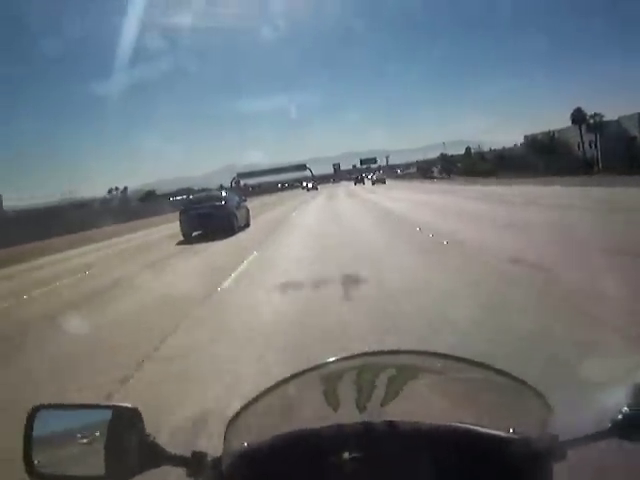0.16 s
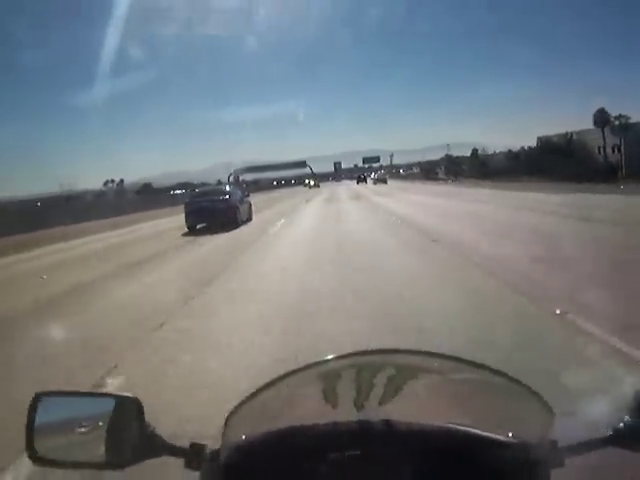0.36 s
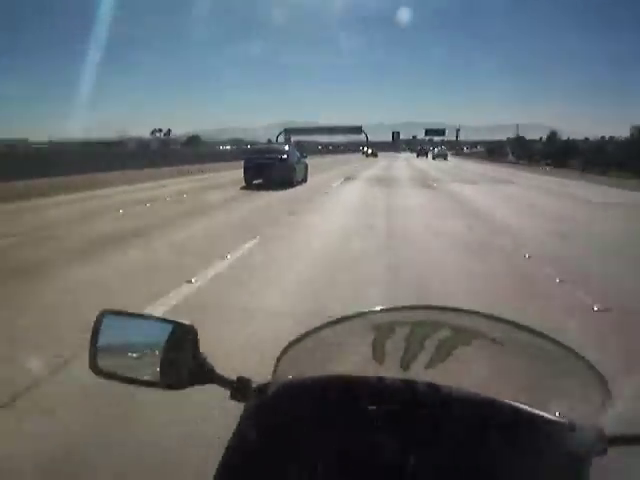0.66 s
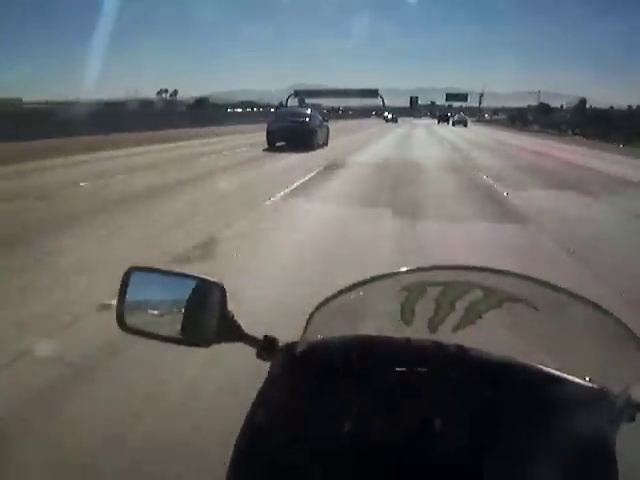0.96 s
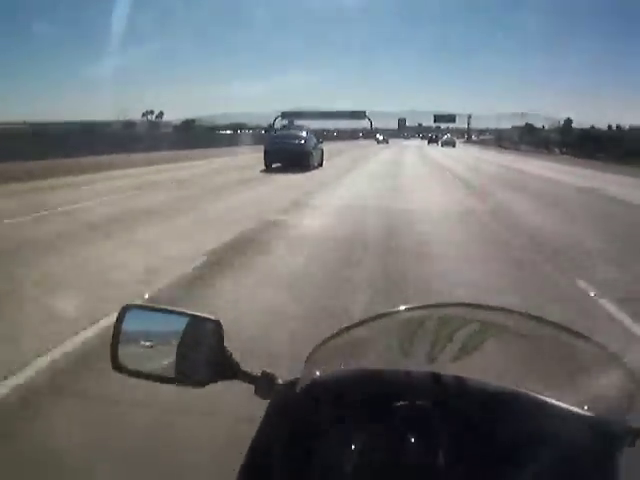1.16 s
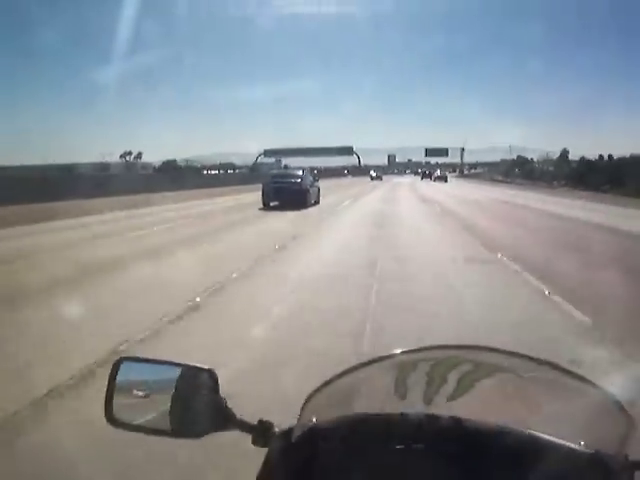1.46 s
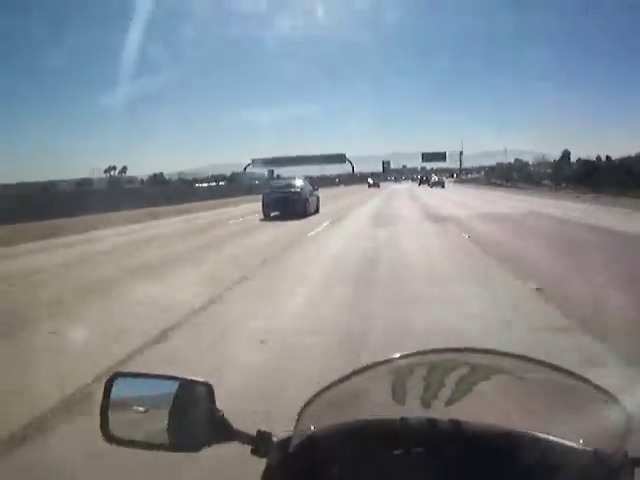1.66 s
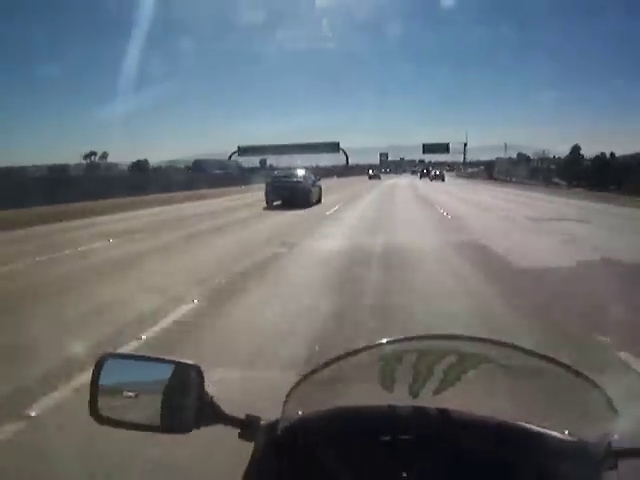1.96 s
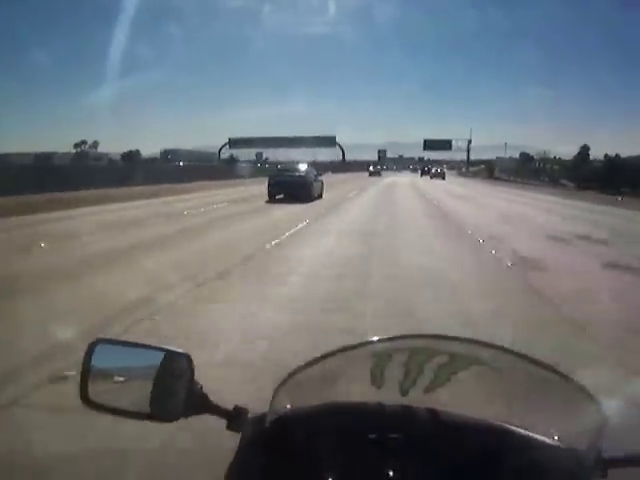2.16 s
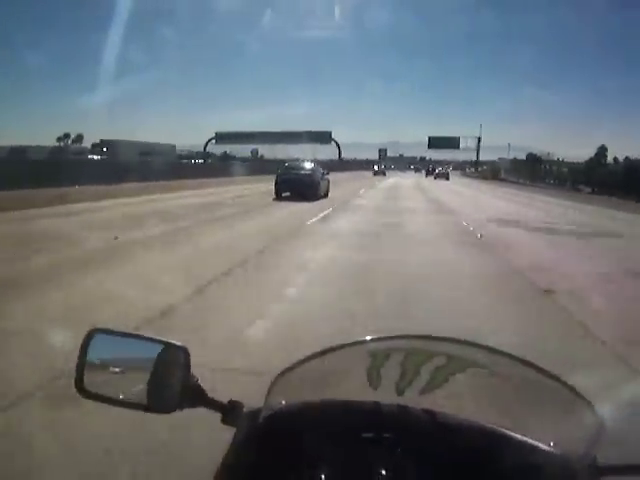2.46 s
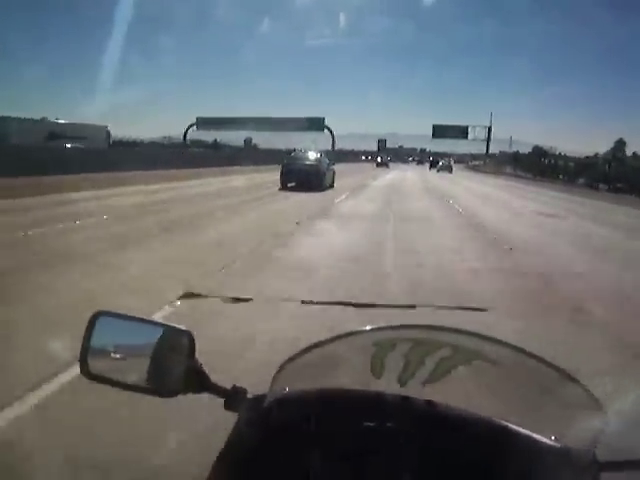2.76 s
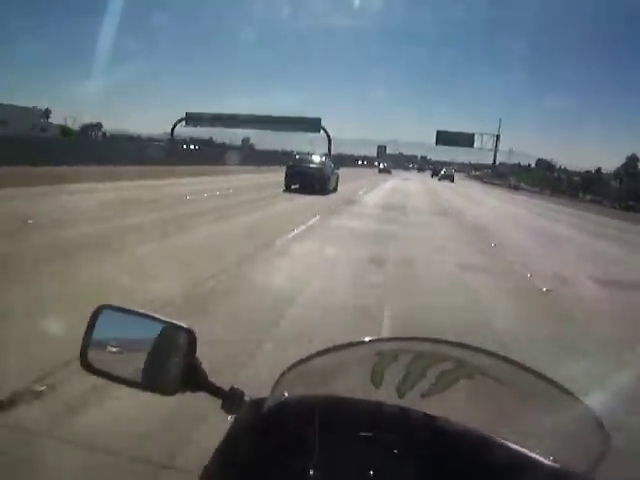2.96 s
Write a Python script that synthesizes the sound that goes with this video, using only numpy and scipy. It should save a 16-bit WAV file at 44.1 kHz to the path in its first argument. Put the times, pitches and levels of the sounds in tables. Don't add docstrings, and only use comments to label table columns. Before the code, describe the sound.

A motorcycle's steady low engine hum beneath heavy, rumbling, flapping wind and a hissing roar.

```python
import sys
import numpy as np
from scipy import signal
from scipy.fft import rfft, irfft, next_fast_len
from scipy.io import wavfile
from scipy.ndimage import uniform_filter1d, map_coordinates

SR = 44100
rng = np.random.default_rng(int(sys.argv[2]) if len(sys.argv) > 2 else 0)


def to_wav(sig):
    pcm = np.clip(np.atleast_2d(sig), -1, 1) * 32767
    pcm = np.round(pcm).astype(np.int16)
    wavfile.write(sys.argv[1], SR, pcm.T)


def nominal_scale(level):
    x = np.asarray(level, float) / 20
    return 10 ** x


N = 136710


def unit(x):
    return x / np.sqrt(np.mean(x ** 2) + 1e-20)


def along(points, hz):
    point_hz, value = np.transpose(points)
    return np.interp(np.log(hz + 1), np.log(point_hz + 1), value)


def curves(rows):
    time_s, *columns = np.transpose(rows)
    return [np.interp(np.arange(N) / SR, time_s, column) for column in columns]


def wobble(rate):
    return map_coordinates(rng.standard_normal(N // 64), [np.arange(N) * rate / SR])


def swell(center_s, length_s):
    offset = (np.arange(N) / SR - center_s) / max(length_s, .004)
    return np.cos(np.pi * np.clip(offset, -1, 1) / 2) ** 2


def swells(rows):
    return sum(lift_db * swell(center_s, length_s) for center_s, length_s, lift_db in rows)


def filtered(x, response):
    size = next_fast_len(N + SR // 2)
    spectrum = rfft(x, size) * response(np.fft.rfftfreq(size, 1 / SR))
    return irfft(spectrum, size)[..., :N]


def rush(response, patchy_db):
    bins = signal.stft(rng.standard_normal(N), nperseg=512)[2]
    patches = uniform_filter1d(rng.standard_normal(bins.shape), size=8, axis=0)
    patches = unit(uniform_filter1d(patches, size=6, axis=1))
    noise = signal.istft(bins * nominal_scale(patchy_db * patches), nperseg=512)[1][:N]
    return unit(filtered(noise, response))


# time_s, level_db
WIND_STRENGTH = [
    (0.0, -22),
    (1.1, -16),
    (1.2, -20),
    (1.25, -18),
    (2.02, -19.5),
    (2.04, -18),
    (2.62, -19.5),
    (2.91, -18),
    (3.1, -15.5),
]


def wind():
    strength_db, = curves(WIND_STRENGTH)
    bursts = wobble(40)
    eddy_gust_db, roar_gust_db = gusts()
    push = buffeting() + eddies(eddy_gust_db, bursts)
    return slapped(nominal_scale(strength_db) * push) + roar(strength_db, roar_gust_db, bursts)


# center_s, length_s, lift_db
BUFFET_SURGES = [(.06, 0.14, 6), (0.406, .1, -2.5), (0.555, 0.18, 2), (0.858, 0.089, -3.5),
                 (1.03, 0.18, -1), (1.33, 0.061, -4), (1.706, 0.12, 1.5), (2.06, 0.15, 2.5),
                 (2.377, 0.19, 0.5), (2.62, 0.16, -2), (2.899, 0.092, 3.5)]
# freq_hz, density_db (per Hz)
BUFFET_COLOUR = [(3, -32), (10, -6.5), (25, 1.5), (60, -1), (110, -6), (200, -20.5), (500, -50.5)]


def buffeting():
    level_db = -0.5 + swells(BUFFET_SURGES) + 0.3 * wobble(9.8)
    return nominal_scale(level_db) * rush(lambda hz: nominal_scale(along(BUFFET_COLOUR, hz)) * (hz < 500), patchy_db=0.35)


# center_s, length_s, lift_db
EDDY_SWELLS = [(0.279, 0.22, 3), (0.389, .14, 1.5), (0.606, 0.074, -2.5), (.9, .4, 0), (1.32, 0.061, -0.5),
               (1.479, .08, 0), (1.69, 0.067, 3.5), (1.86, .16, 1.5), (1.971, .1, -1.5), (2.199, .08, 1.5),
               (2.446, 0.091, 4), (2.696, 0.2, 1), (2.98, 0.09, 5)]
# freq_hz, density_db (per Hz)
EDDY_COLOUR = [(60, -21.5), (120, 2), (200, -0.5), (300, -5.5), (430, -12.5), (700, -25.5), (1100, -48)]


def eddies(gust_db, bursts):
    level_db = -4.5 + gust_db + swells(EDDY_SWELLS) + 1.3 * bursts
    return nominal_scale(level_db) * rush(lambda hz: nominal_scale(along(EDDY_COLOUR, hz)) * (hz < 1100), patchy_db=-0.75)


# center_s, eddy_lift_db, roar_lift_db
SHORT_GUSTS = [(0.234, -2, 1.5), (0.353, 6.5, 3), (0.457, 3, 0.7), (0.569, 5.5, -0.5), (0.821, 11, 1.5),
               (0.921, 4, 1.5), (1.019, 4.8, 2.5), (1.16, 5, 1.5), (1.24, 2, 1.5), (1.305, 3.5, 2),
               (1.374, 5.5, -0.3), (1.769, 0.5, 2.8), (1.803, 2, 1.2), (1.962, 0.5, 0.5), (2.073, 3, 5.5),
               (2.116, 5, 4), (2.199, 3.5, 4), (2.256, 3.5, 3), (2.299, 1, 1), (2.337, 9, 3.5),
               (2.387, 4, 1.5), (2.46, -0.3, 1), (2.5, 1.5, 3.5), (2.546, 5, -0.5), (2.614, 7, 2.5),
               (2.672, 1.5, 1), (2.711, 6.5, 6.5), (2.753, 7.5, 1.8), (2.864, 3.5, 4), (2.913, 2.6, 5),
               (3.017, 0.5, 4)]


def gusts():
    gust_s, between_gusts_db = 0.034, -1.5
    eddy_db, roar_db = sum(np.outer(lifts_db, swell(center_s, gust_s))
                           for center_s, *lifts_db in SHORT_GUSTS)
    return between_gusts_db + eddy_db, roar_db


# center_s, peak_db, width_ms
PORT_SLAPS = [(.013, -9, 2.3), (.062, -7.5, 2.4), (.357, -12.5, 2.2), (0.46, -11, 2.2), (.533, -8.5, 1.9),
              (.651, -5, 2.4), (0.715, -8, 2.1), (.818, -10, 3), (.841, -11, 4.3), (.964, -7, 2.9),
              (1.027, -9, 4.1), (1.081, -11.5, 2.4), (1.377, -19.5, 4.1), (1.466, -10.5, 3.9),
              (1.592, -8, 2.1), (1.716, -15, 1.3), (1.799, -7.5, 1.7), (1.967, -15, 1.8),
              (2.044, -7.5, 4.1), (2.07, -16.5, 1.3), (2.11, -13, 2.1), (2.201, -12.5, 5.7),
              (2.918, -12, 7.5), (2.971, -11.5, 1.9)]


def slapped(air):
    t = np.arange(N) / SR
    hush_depth, hush_s = .85, .007
    hush = np.clip(sum(swell(center_s, hush_s) for center_s, _, _ in PORT_SLAPS), 0, 1)
    slaps = sum(nominal_scale(peak_db) / (1 + (2000 * (t - center_s) / width_ms) ** 2)
                for center_s, peak_db, width_ms in PORT_SLAPS)
    return air * (1 - hush_depth * hush) + slaps


# freq_hz, density_db (per Hz)
ROAR_COLOUR = [(300, -12), (800, -4.5), (1150, -5.5), (1600, -3.5), (2900, -10.5), (4200, -17),
               (7000, -19.5), (8200, -30)]
# center_hz, width_hz, level_db
HOUSING_CAVITIES = [
    (1356, 87, -57.5),
    (2102, 570, -48),
    (3520, 560, -55.5),
]


def roar(strength_db, gust_db, bursts):
    air = nominal_scale(-45) * rush(lambda hz: nominal_scale(along(ROAR_COLOUR, hz)) * (hz > 300), patchy_db=0.93)
    for center_hz, width_hz, level_db in HOUSING_CAVITIES:
        def resonance(hz):
            return (hz * width_hz / (center_hz ** 2 - hz ** 2 + 1j * hz * width_hz)) ** 2
        air = air + nominal_scale(level_db) * rush(resonance, patchy_db=-2.9)
    follow_db = .25 * (strength_db - strength_db.mean()) + .5 * gust_db
    flutter_db = .25 * wobble(11.0) + 0.086 * bursts + 0.17 * wobble(40)
    return nominal_scale(follow_db + flutter_db) * air


# time_s, first_order_db, upper_orders_db
ENGINE_LEVEL = [(0, -31, -33), (.3, -31.5, -33.5), (.6, -27, -32.5), (1, -32, -32), (1.3, -29.5, -32),
                (1.65, -31, -35), (2, -28, -34.5), (2.25, -27, -34), (2.5, -26.5, -35), (2.8, -28, -34.5),
                (3.1, -24.5, -34.5)]
# level_db (against the engine level), change_db_per_s
FIRING_ORDERS = [
    (-0.5, 0),
    (0.5, 0.5),
    (-33, 2.5),
    (-20.5, 0.1),
    (-28.5, -.5),
    (-30, 3),
]
ORDER_FLUTTER = (.6, .9, 3, 1, 2, 2)


def engine():
    t = np.arange(N) / SR
    first_db, upper_db = curves(ENGINE_LEVEL)
    firing_hz = 223.9 + 4.3 * t + .2 * wobble(6.15)
    phase = 2 * np.pi * np.cumsum(firing_hz) / SR
    hum = np.zeros(N)
    for order, ((level_db, change_db_per_s), flutter_db) in enumerate(zip(FIRING_ORDERS, ORDER_FLUTTER), 1):
        base_db = first_db if order == 1 else upper_db
        order_db = base_db + level_db + change_db_per_s * t + flutter_db * wobble(24.83)
        hum += nominal_scale(order_db) * np.sin(order * phase + rng.uniform(0, 2 * np.pi))
    return np.sqrt(2) * hum


# center_s, length_s, level_db, pitch_hz
WHISTLE_PUFFS = [(.29, .05, -62, 4550), (0.526, .09, -52.5, 4630), (0.676, .09, -52, 4750),
                 (0.764, .06, -61, 4550), (0.79, .07, -53.5, 4600), (0.833, .05, -55, 5040),
                 (0.897, .05, -58, 4940), (1.04, .07, -51.5, 5000), (1.15, .07, -57, 4750),
                 (1.22, .08, -54, 4600), (1.292, .07, -52.5, 4840), (1.42, .06, -59, 4570),
                 (1.96, .06, -57.5, 4530), (2.115, .04, -47, 4730), (2.161, .04, -47.5, 4650),
                 (2.2, .04, -55, 4950), (2.26, .05, -58, 4740), (2.328, .07, -48, 4720),
                 (2.35, .05, -61, 4820), (2.382, .045, -47.5, 4680), (2.47, .06, -52, 4770),
                 (2.585, .04, -54, 4630), (2.625, .05, -52, 4800), (2.668, .08, -48, 4720),
                 (2.713, .05, -52, 4762), (2.753, .07, -48, 4820), (2.829, .05, -52, 4700),
                 (2.872, .05, -57, 4660), (2.92, .05, -55, 4750), (2.965, .06, -51.5, 4700),
                 (3.01, .05, -53, 4700), (3.05, .06, -53.5, 4620), (3.082, .06, -47.5, 4800)]


def whistle():
    t = np.arange(N) / SR
    width_hz, waver_hz = 260, 25
    rest_db, rest_hz = -64, 4660
    cosine_part, sine_part = (rush(lambda hz: 1 / (1 + (2 * hz / width_hz) ** 2), patchy_db=0)
                              for _ in range(2))
    waver = 2 * np.pi * np.cumsum(waver_hz * wobble(14)) / SR

    def tone(pitch_hz):
        phase = 2 * np.pi * pitch_hz * t + waver
        return cosine_part * np.cos(phase) + sine_part * np.sin(phase)

    puffs = sum(nominal_scale(level_db) * swell(center_s, .7 * length_s) * tone(pitch_hz)
                for center_s, length_s, level_db, pitch_hz in WHISTLE_PUFFS)
    return nominal_scale(wobble(60)) * (puffs + nominal_scale(rest_db) * tone(rest_hz))


def scene():
    return (wind() + engine() + whistle())[None]


def low_pass(x):
    return signal.sosfilt(signal.butter(12, 9000, fs=SR, output="sos"), x)


# freq_hz, gain_db
BAND_LIMIT = [(7000, 0), (7800, -3), (8300, -11), (8750, -22.5), (9000, -34)]


def record(dry):
    span = int(.03 * SR)
    pivot_db, control_share = -19, .45
    power = np.abs(uniform_filter1d(uniform_filter1d(dry ** 2, span), span)) + 1e-9
    x = dry * (power / nominal_scale(2 * pivot_db)) ** (-control_share / 2)

    lean = 1.49
    x = np.expm1(lean * x) / lean
    x = x - x.mean()

    limit, knee = np.where(x > 0, .53, .36), np.where(x > 0, 4, 3.5)
    x = x / (1 + np.abs(x / limit) ** knee) ** (1 / knee)

    grit_db, grit_power = -33, 0.95
    x = x + nominal_scale(grit_db) * np.abs(x) ** grit_power * rng.standard_normal(x.shape)

    low_hz = 2.4
    x = filtered(x, lambda hz: nominal_scale(along(BAND_LIMIT, hz)) * hz ** 2 / (hz ** 2 + low_hz ** 2))
    return low_pass(x)


dry = scene()
out = record(dry)
to_wav(out)
```